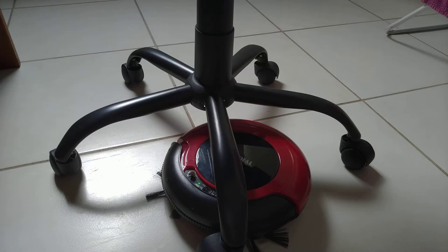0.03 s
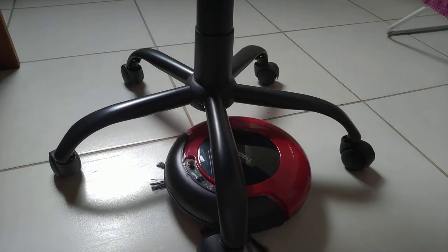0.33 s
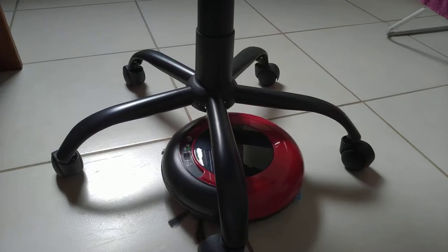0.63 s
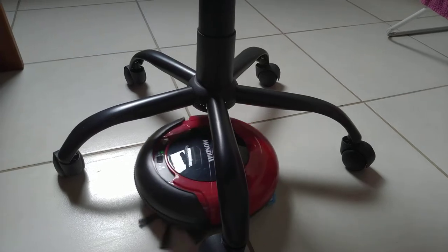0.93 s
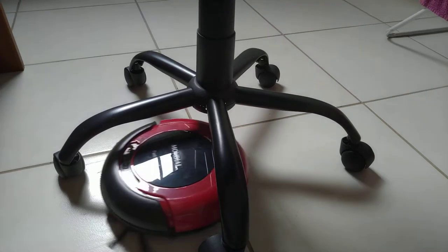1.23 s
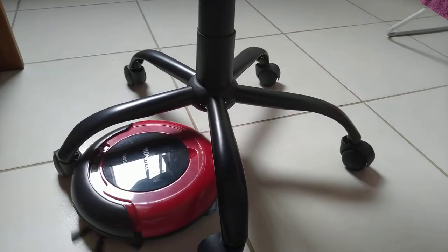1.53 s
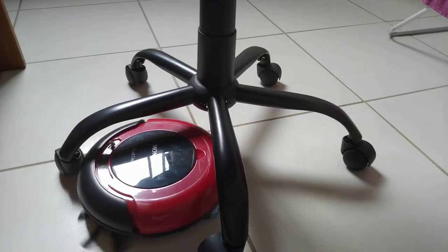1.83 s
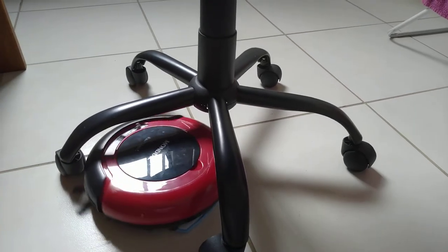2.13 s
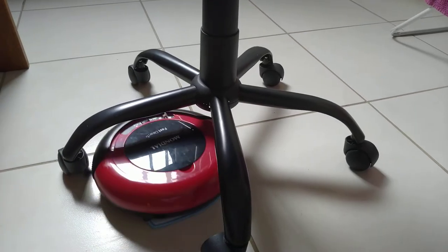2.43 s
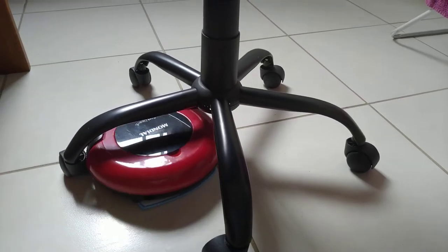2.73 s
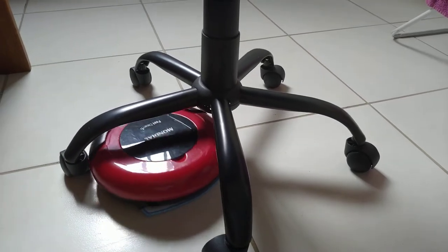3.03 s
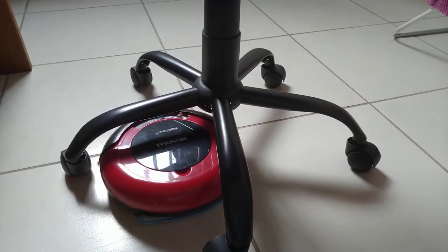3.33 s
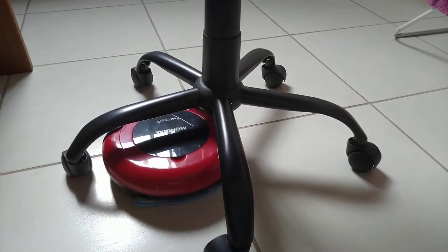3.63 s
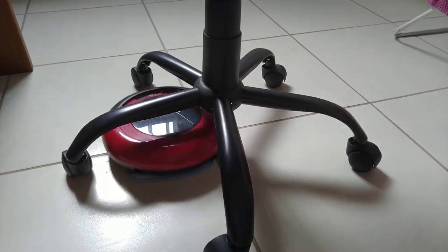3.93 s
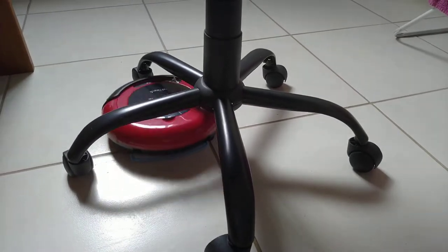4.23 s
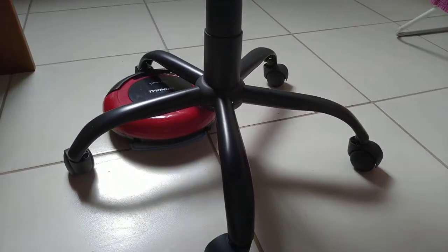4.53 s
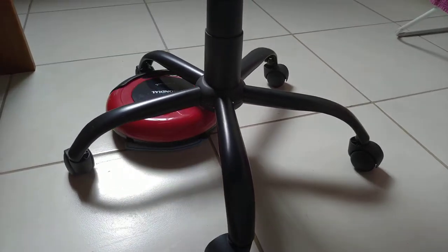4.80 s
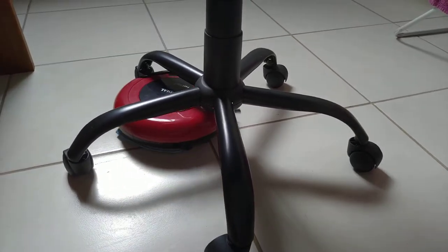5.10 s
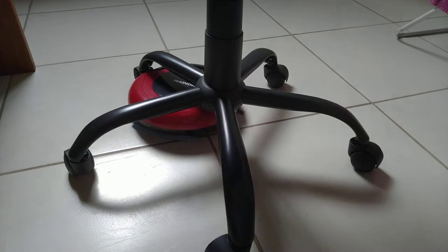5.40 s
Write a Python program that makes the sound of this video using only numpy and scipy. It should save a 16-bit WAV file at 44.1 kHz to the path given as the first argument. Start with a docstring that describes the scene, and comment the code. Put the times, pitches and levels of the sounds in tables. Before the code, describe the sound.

A robot vacuum fades in quickly on a tiled floor, close by in a small hard room. Its fan hum, wavering whistle, rushing air and brush whir continue for the whole five and a half seconds. Faint wheel whine, bristle hiss and low rumble rise in short runs. A light plastic tap comes at 0.2 seconds, then a scrape and hollow clunk at 0.6. The loudest bumper clacks hit an office chair from 1.5 to 1.8, with a faint high swish of bristles. The underside scuffs over tile joints and clunks around 2.4 and 3.4. Lighter knocks land at 2.7, 3.1 and 3.6, and a rattling cluster follows from 4.4 to 4.7. A clunk at 5.1, a sharp click at 5.3 and another clunk at 5.4 come last, with the vacuum still running. The knocks have a short echo.

```python
"""A fan's hum and a brush's whir fade in: a robot vacuum is cleaning a tiled floor.
Its plastic bumper clacks against an office chair, and the small hard room echoes the knocks.
The wheel gears whine in short runs, the underside scuffs over tile joints, loose parts clunk
inside the body, and the side bristles swish along a chair leg."""
import sys
import numpy as np
from scipy import signal
from scipy.fft import rfft, irfft, next_fast_len
from scipy.io import wavfile
from scipy.ndimage import map_coordinates

SR = 44100
rng = np.random.default_rng(int(sys.argv[2]) if len(sys.argv) > 2 else 0)


def output_pcm(signal):
    """Save a mono or channel-first signal as 16-bit PCM at the path in sys.argv[1].

    Samples are clipped to [-1, 1] before scaling.
    """
    pcm = np.clip(np.atleast_2d(signal).T, -1, 1) * 32767
    wavfile.write(sys.argv[1], SR, np.round(pcm).astype(np.int16))


N = 245195
TIME = np.arange(N) / SR


def amp(db):
    """Turn decibels into a number to multiply by."""
    return 10 ** (np.asarray(db) / 20)


def along(points, hz):
    """Read a (frequency, value) table at hz, on a log scale."""
    f, v = np.transpose(points)
    return np.interp(np.log(hz + 1), np.log(f + 1), v)


def curves(rows):
    """Join a table's dots over time: one curve for each column after the first."""
    times, *columns = np.transpose(rows)
    return [np.interp(TIME, times, column) for column in columns]


def swells(rows):
    """A volume curve with one smooth hump for each row."""
    return sum(amp(db) * np.exp(-((TIME - s) / half) ** 2) for s, db, half in rows)


def wobble(rate):
    """A smooth curve through rate random points a second."""
    return map_coordinates(rng.standard_normal(int(N * rate / SR) + 4), [TIME * rate])


def filtered(x, response):
    """Turn each frequency in x up or down by response(hz)."""
    size = next_fast_len(N + SR // 2)
    return irfft(rfft(x, size) * response(np.fft.rfftfreq(size, 1 / SR)), size)[..., :N]


# How alike left and right are: f/Hz, likeness (1 same, -1 opposite)
LIKENESS = [(100, 0.98), (350, 0.98), (550, 0.73), (800, 0.47), (1050, 0.27), (1400, -0.71), (1900, 0.17),
            (2800, 0.021), (5000, -0.058), (12000, 0.0016)]
def spread(pair):
    """Mix two unrelated signals into left and right, alike in the bass."""
    turn = lambda hz: np.arccos(np.clip(along(LIKENESS, hz), -1, 1)) / 2
    mid, side = filtered(pair, lambda hz: np.array([np.cos(turn(hz)), np.sin(turn(hz))]))
    return np.array([mid + side, mid - side])


def rush(spectrum, flutter=1):
    """Stereo noise, shaken by flutter, shaped by spectrum and scaled to an average power of 1."""
    white = flutter * rng.standard_normal((2, N))
    noise = spread(filtered(white, lambda hz: amp(along(spectrum, hz))))
    return noise / np.sqrt(np.mean(noise ** 2) + 1e-20)


def shaft_tones(shaft_hz, table, drift):
    """Tones of a spinning shaft, wavering as the robot moves through the room's loud and quiet spots."""
    angle = 2 * np.pi * np.cumsum(shaft_hz) / SR
    out = np.zeros((2, N))
    loudest_db = max(db for _, db, _, _ in table)
    for multiple, db, wander_db, lead in table:
        stray = min(1, (loudest_db - db) / 12) * .8 * wobble(7)  # weak tones stray most
        phase = multiple * angle + rng.uniform(0, 2 * np.pi) + stray
        level = db + np.clip(wander_db, 0, 5) * np.tanh(wobble(8))
        apart = (lead + drift * multiple * wobble(2.88)) / 2
        out += np.sqrt(2) * amp(level) * np.sin([phase + apart, phase - apart])
    return out


def resonate(x, notes, pitch):
    """Let x ring an object's natural notes, their frequencies multiplied by pitch."""
    f = np.fft.rfftfreq(x.shape[-1], 1 / SR) / pitch
    gain = sum((-1) ** k * amp(db) * 1j * f * width / (hz * hz - f * f + 1j * f * width)
               for k, (hz, width, db) in enumerate(notes))
    return irfft(rfft(x) * gain / np.sqrt(np.mean(np.abs(gain) ** 2)), x.shape[-1])


# The fan's turning speed, sagging as the wheels pull away: t/s, f/Hz
FAN_SPEED = [(0.3, 116), (0.6, 117.2), (0.8, 116.3), (1.2, 117.2), (1.6, 117.6), (2.0, 117), (2.3, 117.6),
             (2.6, 116.9), (2.9, 117.1), (3.6, 116.5), (4.1, 117.6), (4.6, 117.3), (4.9, 116.9),
             (5.1, 117.1), (5.3, 116.4), (5.54, 116.9)]
# Its tones swell and sink as the robot turns: t/s, then level/dB for hum, low whistle, high whistle
FAN_LEVELS = [(0.3, -42, -49, -52.5), (0.6, -40.5, -51, -50.5), (1.3, -38, -56, -54),
              (1.6, -40.5, -54.5, -51.5), (2.1, -38.5, -49, -52.5), (2.3, -38.5, -45.5, -47.5),
              (2.68, -39, -46.5, -52.5), (2.8, -39, -43.5, -45.5), (2.98, -39.5, -44.5, -43),
              (3.1, -41, -47.5, -48), (3.4, -40.5, -46.5, -46), (3.6, -40.5, -55, -55.5),
              (3.8, -39, -46.5, -47.5), (4.2, -40, -61, -52.5), (4.34, -39.5, -58, -43),
              (4.46, -42, -54, -50.5), (4.51, -42, -61, -46), (4.61, -40.5, -58, -46),
              (4.75, -40, -55, -49.5), (5.12, -40.5, -50, -54), (5.4, -44, -48, -46.5),
              (5.54, -39, -70, -49.5)]
# The hum's tones: cycles per turn, level/dB, wander/dB (held to 0-5), left ear's lead/rad
HUM_TONES = [(1, -24, 3.5, 0.5), (3, -10, 4.5, 0.27), (4, 0, 1, 0.5), (5, -9.5, 2.5, 0.65),
             (7, -16.5, 6, 0.5), (8, -20.5, -1.5, 1.5), (9, -15, 5, -2.2), (12, -14, 6, -2),
             (13, -14, 3, -2.5)]
def fan():
    """The suction fan hums, loudest at four cycles per turn, and whistles at ten and eleven."""
    hum_db, low_db, high_db = curves(FAN_LEVELS)
    shaft_hz = curves(FAN_SPEED)[0] * (1 + 0.0012 * wobble(40))
    hum = amp(hum_db + 2.5) * shaft_tones(shaft_hz, HUM_TONES, drift=0.049)
    low_whistle = amp(low_db + 3.5) * shaft_tones(shaft_hz, [(10, 0, 1, -1.3)], drift=.04)
    high_whistle = amp(high_db + 5.5) * shaft_tones(shaft_hz, [(11, 0, 1, -1.3)], drift=.03)
    return hum + low_whistle + high_whistle


# The brush motor's tones: same columns as HUM_TONES
BRUSH_TONES = [(1, -63.5, 6, 0), (2.01, -65, -2, 0), (3.01, -60, 0, -0.75), (3.82, -56.5, 13, 0.38),
               (4.18, -57.5, 9.5, -0.051), (5.56, -57.5, 9, 0.17), (6.4, -56, 5, -0.13),
               (7.14, -53, 0, -0.57)]
# The noise of its gears: f/Hz, level/dB
WHIR_SPECTRUM = [(600, -31), (1400, -1.5), (1850, -1.5), (2250, -0.5), (2800, -4.5), (3600, -8),
                 (4300, -17), (5800, -17), (7500, -45), (12000, -56)]
def brush(drive, nearness):
    """The brush motor drones while its gear teeth catch once a turn, each time with another force."""
    shaft_hz = 133.2 * (1 + 0.0123 * wobble(6))
    motor = shaft_tones(shaft_hz, BRUSH_TONES, drift=0.21)
    catch = amp(np.sin(2 * np.pi * np.cumsum(shaft_hz) / SR) + 0.63 * wobble(260))
    whir = amp(-46.5 + 2 * drive + 1.1 * wobble(24.99)) * rush(WHIR_SPECTRUM, catch)
    return motor + nearness * whir


# The noise of moving air: f/Hz, level/dB
AIR_SPECTRUM = [(30, -33), (90, -16), (180, -14), (275, -7), (300, -12), (335, -1), (420, 1.5), (540, 1.5),
                (660, -3), (780, -5.5), (990, -1.5), (1110, -3.5), (1350, 0.5), (1800, -10.5),
                (3200, -41.5)]
def air(drive):
    """Air rushes through the duct, a little louder while the robot drives."""
    return amp(-39 + 2 * drive + 0.15 * wobble(4.3)) * rush(AIR_SPECTRUM, amp(1.27 * wobble(120)))


# The noise of bristles on tile: f/Hz, level/dB
HISS_SPECTRUM = [(1500, -34), (3500, 9), (5000, 4.5), (6500, 7.5), (7500, 3), (9200, 3), (10800, 4.5),
                 (11900, 8), (13500, 1.5), (15700, -21)]
def bristle_hiss(drives):
    """The bristles keep turning with a soft hiss, which grows as the robot drags them along."""
    resting = amp(-61.5)
    dragging = amp([db for _, _, _, db in WHEEL_RUNS]) @ drives
    return np.hypot(resting, dragging) * rush(HISS_SPECTRUM, amp(0.39 * wobble(330)))


# Moments when the body rocks: t/s, level/dB, half length/s
ROCKING = [(1.25, -51, 0.15), (2.25, -47, 0.053), (2.67, -61.5, .07), (3.18, -43.5, 0.084),
           (3.87, -56, 0.16), (4.5, -42, .11), (5.33, -55, 0.05)]
# The deep noise of rolling: f/Hz, level/dB
RUMBLE_SPECTRUM = [(20, -42), (45, -26), (56, -12), (62, 2.5), (70, -0.5), (78, -11), (108, -23),
                   (122, -9.5), (136, -5.5), (152, -19), (300, -55), (1000, -80)]
def rumble(drive):
    """A low rumble grows as the robot rolls and swells as it rocks on its wheels."""
    return (amp(-59.5 + 3.5 * drive) + swells(ROCKING)) * rush(RUMBLE_SPECTRUM)


# Hits on the chair: t/s, level/dB, length/s, head-on (0 glancing to 1 straight), pitch factor
HITS = [(0.186, -37.5, 0.048, 0.65, 1), (1.519, -34, 0.061, 0.9, 0.94), (1.529, -26, 0.049, 0.94, 1.08),
        (1.533, -30.5, 0.049, 0.25, 0.97), (1.625, -38.5, 0.065, 0.97, 0.99),
        (1.739, -36, 0.16, 0.29, 1.01), (2.686, -37.5, 0.047, 0.63, 0.91), (2.753, -42.5, 0.048, 0.97, 1),
        (3.038, -41, 0.074, 1, 1.15), (3.121, -33, 0.066, 0.45, 0.92), (3.134, -35.5, 0.094, 0.58, 0.94),
        (3.62, -36.5, 0.072, 0.061, 0.9), (4.406, -37, 0.12, 0.97, 0.91), (4.43, -37, 0.14, 0.84, 1.1),
        (4.463, -34.5, 0.24, 0.66, 1.03), (4.596, -44.5, 0.05, 0.99, 1.13), (4.638, -40.5, 0.056, 0.6, 1.1),
        (5.2892, -32, .015, 0.02, 1.03), (5.295, -40.5, .19, 0.29, 0.92), (5.422, -44.5, 0.018, 0.89, 0.59)]
# The hollow notes of the bumper's wall: f/Hz, level/dB
WALL_NOTES = [(1890, -3.5), (2210, 3.5), (2540, -9)]
# The notes of the plastic shell: f/Hz, width/Hz, level/dB
SHELL_NOTES = [(940, 650, -4), (1320, 160, -2), (1470, 64, -4), (2100, 500, 3.5), (2740, 210, -7),
               (3820, 230, -26)]
# The catch's bright snap and the body's dull thud: f/Hz, level/dB
SNAP_SPECTRUM = [(800, -32), (2800, 3.5), (4400, 3), (5500, -1), (7000, -14.5), (10000, -7), (12500, -6),
                 (16000, -19)]
THUD_SPECTRUM = [(25, -42), (65, -11), (115, 0.5), (200, -0.5), (350, 3), (520, 0), (1000, -17),
                 (3000, -80)]
def bumper():
    """Each hit is a blow and a dying chatter: glancing hits ring more, head-on hits snap and thud more."""
    t = np.arange(SR // 2) / SR
    decay = lambda seconds: amp(-60 * t / seconds)  # falls 60 dB in this time
    rise = lambda seconds: 1 - np.exp(-t / seconds)
    ring, (thud_power, snap_power) = np.zeros((2, 2, N + SR))
    for s, db, length, head_on, pitch in HITS:
        span = slice(round(s * SR), round(s * SR) + len(t))
        wall = sum(amp(level) * np.sin(2 * np.pi * (hz * pitch * t + rng.random()))
                   for hz, level in WALL_NOTES)
        blow = wall * decay(0.016) * rise(0.0009)
        shaking = amp(db) * decay(length) * rng.standard_normal((2, len(t)))
        chatter = resonate(shaking, SHELL_NOTES, pitch)
        ring[:, span] += amp(db + 8 - 10 * head_on) * blow / np.abs(blow).max() + chatter
        snap = decay(0.8 * length) + amp(0.5) * decay(0.0073)  # opens with a quick crack
        snap_power[span] += (amp(db - 16.5 + 14 * head_on) * snap) ** 2
        thud = decay(0.063 + 0.71 * length) + amp(-0.5) * decay(0.031)  # opens with a shove
        thud_power[span] += (amp(db - 18 + 16.5 * head_on) * thud) ** 2 * rise(0.0011)
    snaps = np.sqrt(snap_power[:N]) * rush(SNAP_SPECTRUM, flutter=amp(3 * wobble(900)))
    thuds = np.sqrt(thud_power[:N]) * rush(THUD_SPECTRUM)
    return ring[:, :N] + snaps + thuds


# How long the echo lasts: f/Hz, time to fall 60 dB/s
ECHO_TIMES = [(150, 0.36), (1000, 0.24), (4000, 0.29), (12000, 0.13)]
def room(x):
    """Tiles and walls send back a short echo whose highest notes die first."""
    hz, t, noise = signal.stft(rng.standard_normal((2, SR // 2)), SR, nperseg=256)
    dying = noise * amp(-60 * t / along(ECHO_TIMES, hz)[:, None])
    tail = signal.istft(dying, SR, nperseg=256)[1]
    return spread(signal.fftconvolve(x, tail / np.linalg.norm(tail[0]), axes=1)[:, :N])


# Short bursts of driving: start t/s, stop t/s, whine level/dB, bristle hiss level/dB
WHEEL_RUNS = [(0.295, 0.628, -63.5, -55.5), (0.718, 1.512, -59.5, -56), (1.82, 2.343, -59, -54),
              (2.45, 2.733, -61, -57), (2.972, 3.152, -59, -54.5), (3.25, 3.42, -60, -59),
              (3.525, 4.442, -56.5, -57.5), (4.739, 5.039, -61, -55.5), (5.17, 5.38, -66, -57)]
def wheel_drives(spin_up_s=.08, coast_s=.09):
    """How hard the wheels drive, 0 to 1, one row per run: they speed up, hold and coast down."""
    since = lambda s: np.maximum(TIME - s, 0)
    return np.array([(1 - np.exp(-since(start) / spin_up_s)) * np.exp(-since(stop) / coast_s)
                     for start, stop, _, _ in WHEEL_RUNS])


# The wheel motor's speed at full drive, changing with the load: t/s, f/Hz
MOTOR_SPEED = [(.62, 135.3), (1.08, 133.7), (1.2, 135.4), (1.37, 133.5), (1.44, 135.5), (1.51, 134),
               (2.05, 134.4), (2.22, 140.2), (2.33, 137), (2.5, 132.5), (3.1, 137), (3.4, 131),
               (3.68, 138.8), (3.88, 134.8), (4.05, 138.7), (4.17, 133.5), (4.27, 136.2), (4.4, 134.3),
               (4.98, 136.5), (5.35, 134)]
# The tones of the gear teeth: same columns as HUM_TONES
GEAR_TONES = [(12.54, 5, 2, 1.5), (34.4, -6, 5, 1.5), (38.2, -9, 4, 1), (39.15, -4.5, 4, 1.5),
              (40.2, -7, 4, 0.5), (43, -1, 3, -1.2), (44, -.5, 3, 1.2), (45.8, -11, 3, 1.5),
              (47.7, -10, 3, -2), (48.7, -8, 3, 2), (49.7, -6, 3, 1.8), (50.6, -9, 3, .8)]
def wheels(drives, sag_hz=17):
    """The wheel gears sing a thin whine that gets higher and louder with the drive."""
    shaft_hz = curves(MOTOR_SPEED)[0] - sag_hz * (1 - drives.sum(axis=0))
    volume = amp([db - 6 for _, _, db, _ in WHEEL_RUNS]) @ drives ** 1.6
    gear_slack = 1 + .0007 * wobble(30) + .0004 * wobble(300)
    tooth_load = amp(2 * np.tanh(wobble(14)))
    whine = shaft_tones(shaft_hz * gear_slack, GEAR_TONES, drift=0.019)
    return volume * tooth_load * whine * amp([[1], [-1]])  # a little to the left


# Crossing the tile joints: t/s, level/dB, half length/s
TILE_JOINTS = [(.39, -46, .03), (.605, -31.5, 0.03), (.83, -39, 0.042), (1.06, -49, .04),
               (2.19, -38, 0.049), (2.366, -33, 0.048), (2.74, -38.5, 0.064), (3.19, -35, 0.057),
               (3.386, -32.5, 0.021), (3.63, -38, 0.024), (5.085, -37.5, 0.03), (5.405, -39, 0.033)]
# The noise of the rubbing: f/Hz, level/dB
SCUFF_SPECTRUM = [(250, -13), (480, 7), (700, 0.5), (1000, 4), (1450, 2), (2300, -6.5), (3500, -21.5),
                  (8000, -50)]
def scuffs():
    """The underside rubs over tile joints with a short, grainy scrape."""
    return swells(TILE_JOINTS) * rush(SCUFF_SPECTRUM, amp(1.2 * wobble(350)))


# Jolts to the robot's body: t/s, level/dB
JOLTS = [(0.599, -36), (0.629, -25.5), (2.35, -33), (2.369, -28), (3.379, -34), (5.065, -26), (5.09, -27),
         (5.399, -25.5), (5.412, -28.5)]
# The body's hollow notes: f/Hz, width/Hz, level/dB
BODY_NOTES = [(770, 220, -4), (1010, 150, 1.5), (1340, 180, -11)]
def clunks(rattle_s=0.036):
    """Each jolt rattles loose parts inside the hollow body."""
    volume = sum(amp(db - 8 - 60 * np.abs(TIME - s) / rattle_s) * (TIME >= s) for s, db in JOLTS)
    return spread(resonate(volume * rng.standard_normal((2, N)), BODY_NOTES, pitch=0.99))


# Brushing past a chair leg: t/s, level/dB
SWISH_LEVELS = [(1.2, -93.5), (1.36, -58), (1.47, -49), (1.55, -48), (1.62, -58), (1.74, -55.5),
                (1.92, -59), (2.1, -63)]
# The noise it makes: f/Hz, level/dB
SWISH_SPECTRUM = [(6000, -40), (8500, -9), (9500, -1.5), (10300, -6), (13000, -11), (16000, -15)]
def chair_swish():
    """The side bristles slide along a chair leg with a very high swish."""
    return amp(curves(SWISH_LEVELS)[0]) * rush(SWISH_SPECTRUM)


def scene():
    """Add up the running robot and its knocks; only the knocks get an echo."""
    drives = wheel_drives()
    drive = drives.sum(axis=0)
    nearness = amp(0.05 * (N / 2 / SR - TIME))  # air and whir fade slightly as the robot moves away
    knocks = amp(0.6) * bumper() + clunks()
    cleaning = fan() + brush(drive, nearness) + nearness * air(drive)
    bristles = bristle_hiss(drives) + chair_swish()
    rolling = rumble(drive) + scuffs() + wheels(drives)
    return cleaning + bristles + rolling + knocks + amp(-1) * room(knocks)


# The opening fade: t/s, level/dB
FADE_IN = [(.105, -17), (.17, -6.5), (.2, -3.5), (.35, -1)]
# A dip in the treble that both microphones share: f/Hz, level/dB
MIC_DIP = [(6900, 0.5), (7500, -4.5), (8200, -14), (8600, -5.5), (9000, -1.5)]
# How much louder left is than right: f/Hz, level/dB
MIC_BALANCE = [(60, 0.5), (110, -2.5), (200, 2.5), (380, -3.5), (700, -0.5), (1290, -0.5), (2380, -1.5),
               (4400, 3.5), (8120, -1), (15000, 3)]
def record(dry, silence_s=.105, top_hz=15750):
    """After a short silence the sound fades in, heard through two slightly different microphones."""
    opening = np.clip((TIME - silence_s) / 0.0038, 0, 1) * amp(curves(FADE_IN)[0])
    colour = lambda hz: amp(along(MIC_DIP, hz) + np.array([[.5], [-.5]]) * along(MIC_BALANCE, hz))
    return filtered(filtered(dry * opening, colour), lambda hz: hz < top_hz)


dry = scene()
out = record(dry)
output_pcm(out)
```